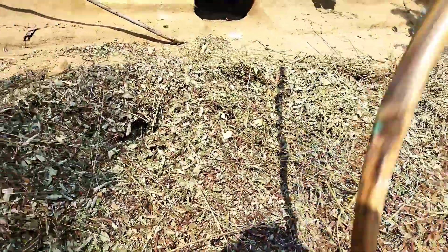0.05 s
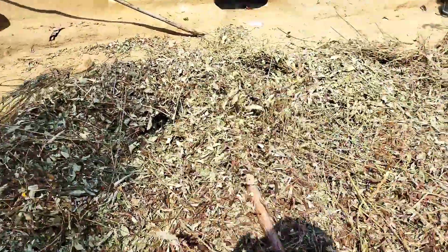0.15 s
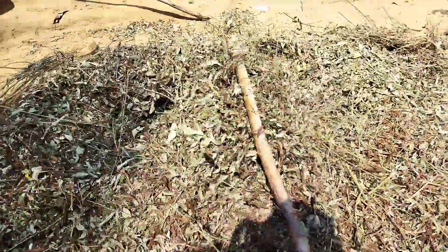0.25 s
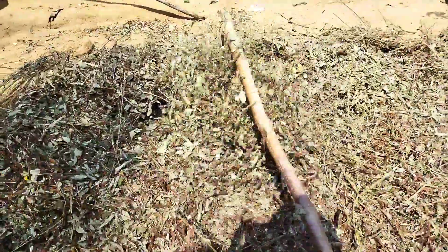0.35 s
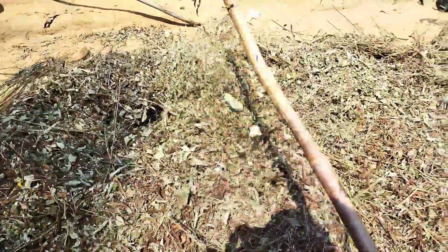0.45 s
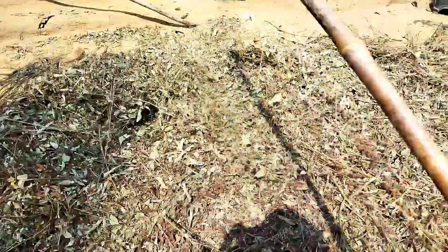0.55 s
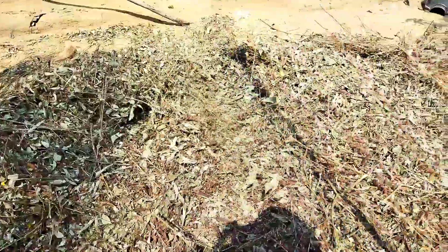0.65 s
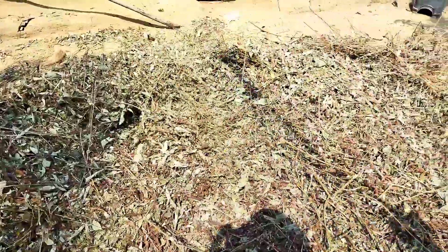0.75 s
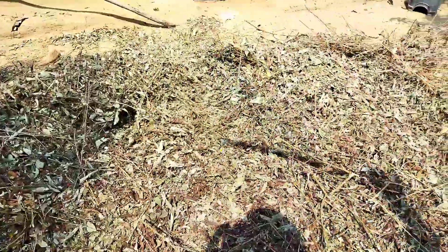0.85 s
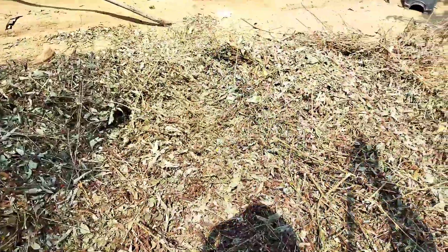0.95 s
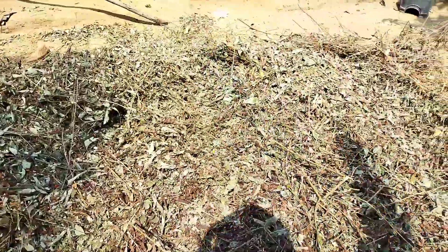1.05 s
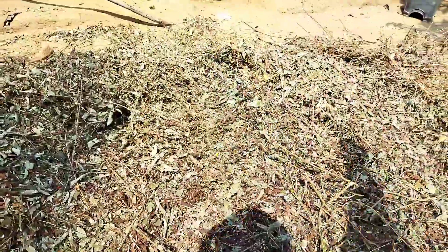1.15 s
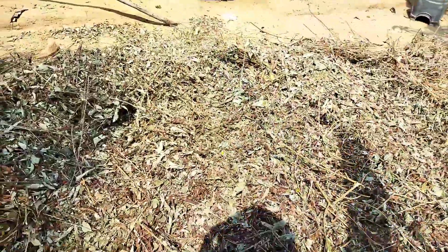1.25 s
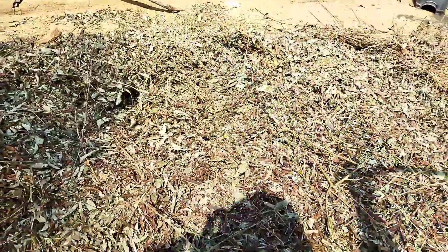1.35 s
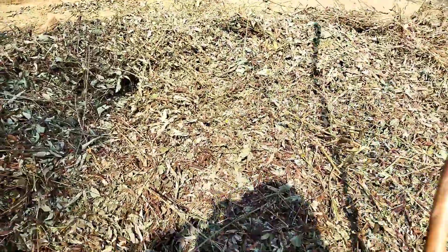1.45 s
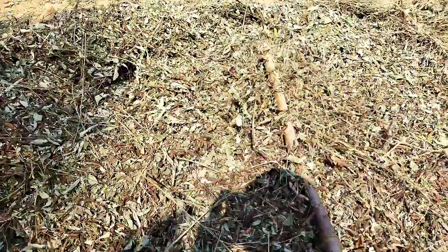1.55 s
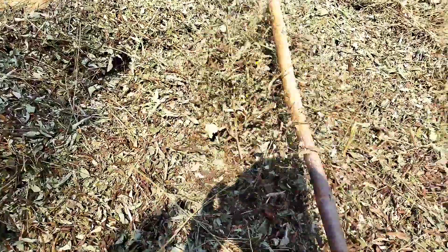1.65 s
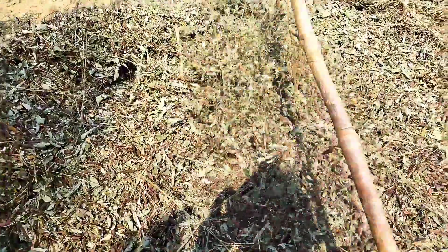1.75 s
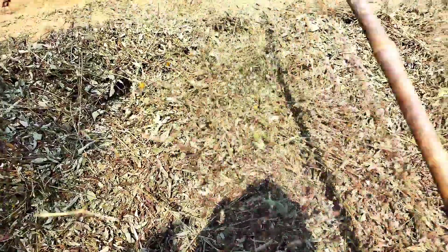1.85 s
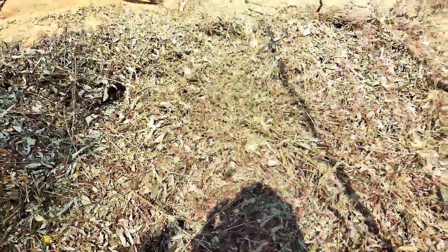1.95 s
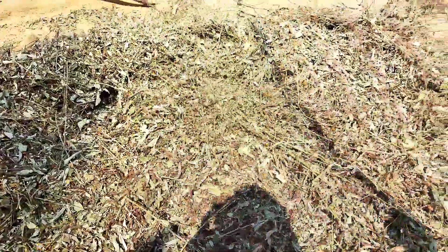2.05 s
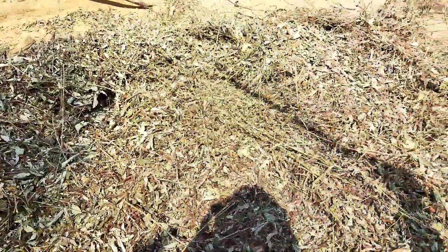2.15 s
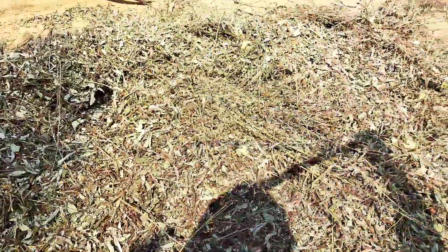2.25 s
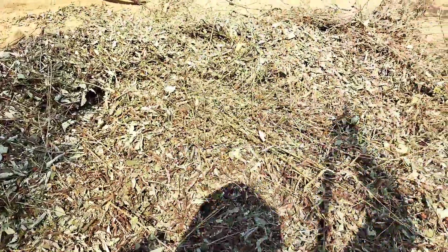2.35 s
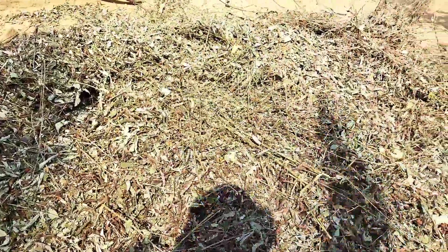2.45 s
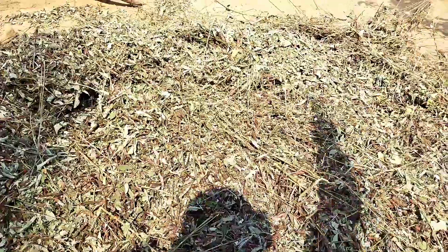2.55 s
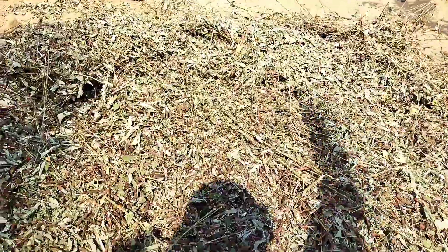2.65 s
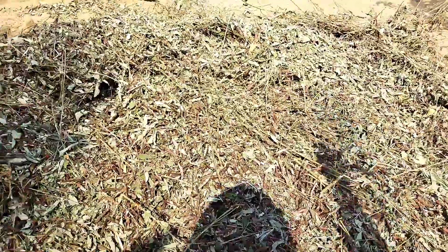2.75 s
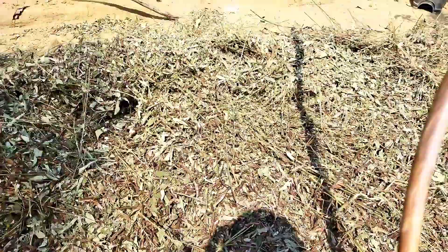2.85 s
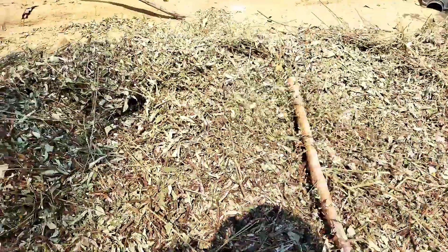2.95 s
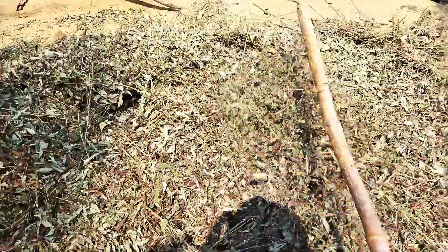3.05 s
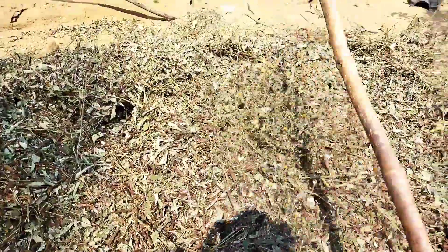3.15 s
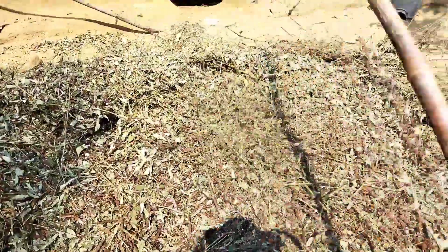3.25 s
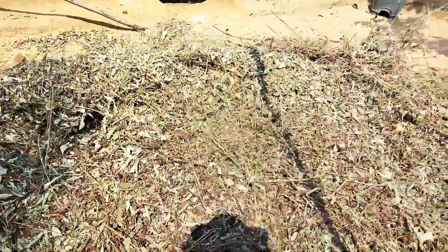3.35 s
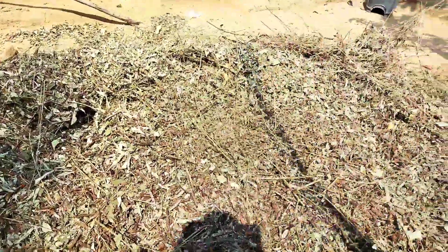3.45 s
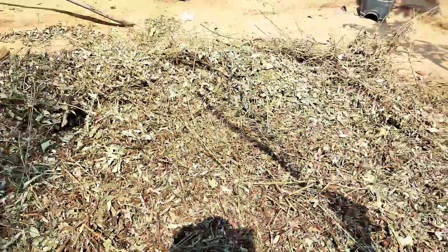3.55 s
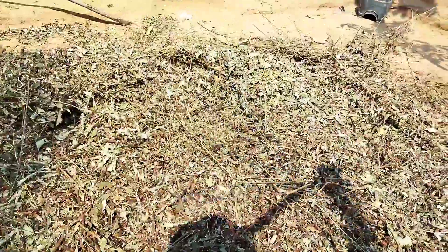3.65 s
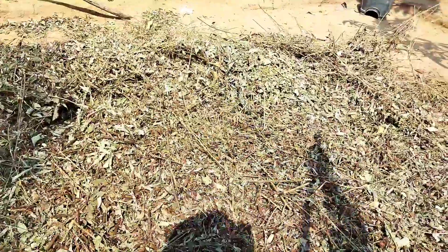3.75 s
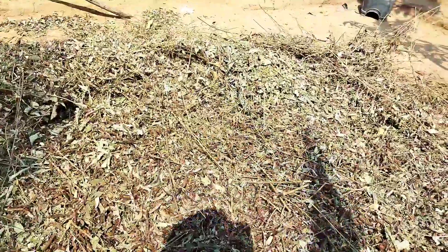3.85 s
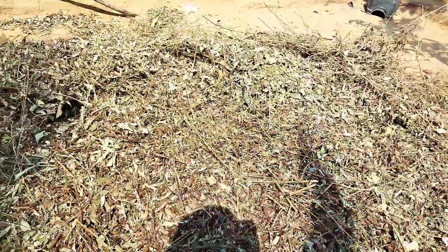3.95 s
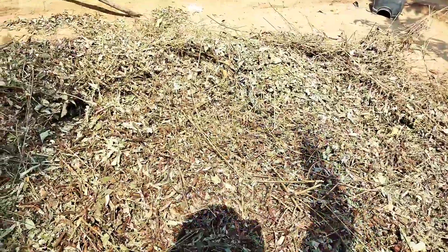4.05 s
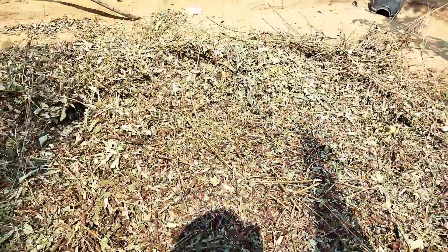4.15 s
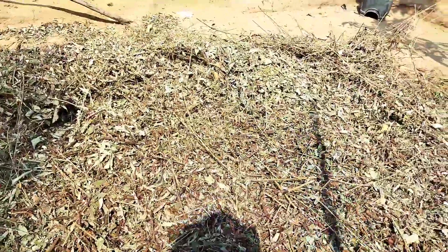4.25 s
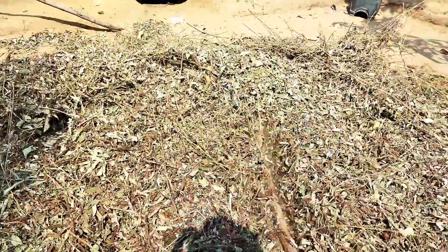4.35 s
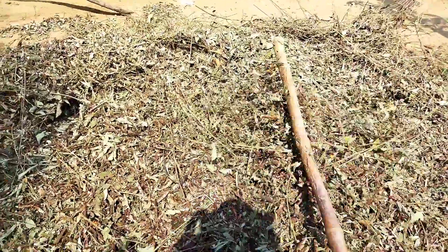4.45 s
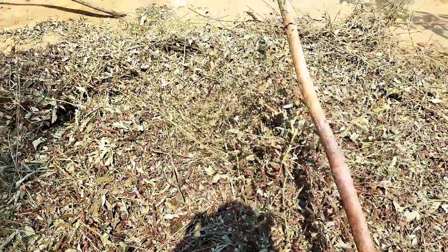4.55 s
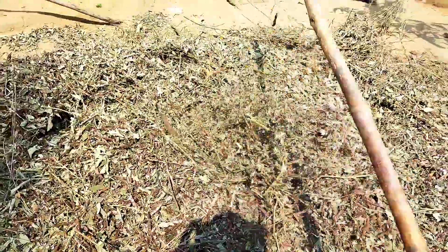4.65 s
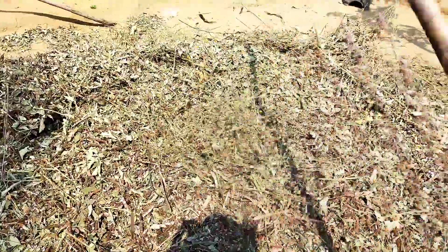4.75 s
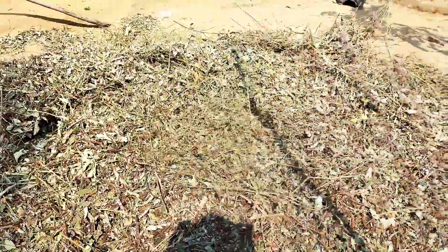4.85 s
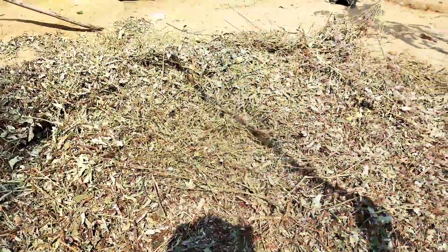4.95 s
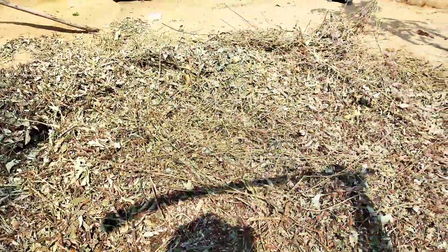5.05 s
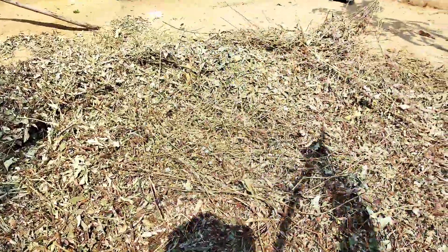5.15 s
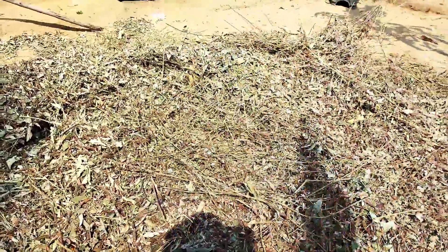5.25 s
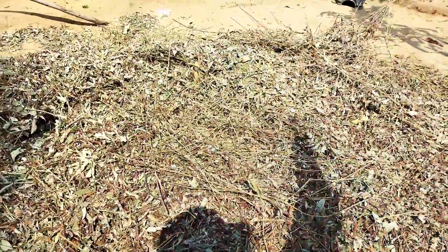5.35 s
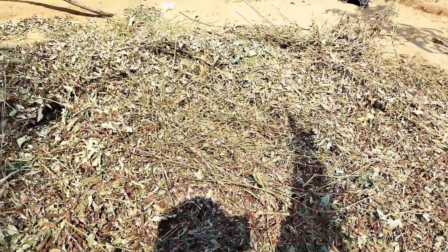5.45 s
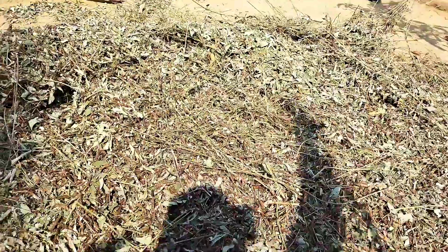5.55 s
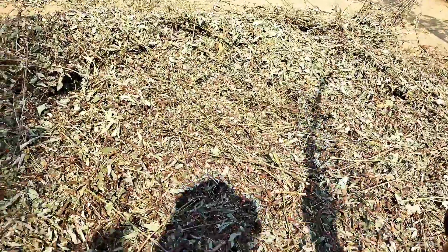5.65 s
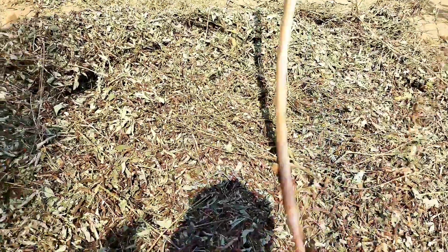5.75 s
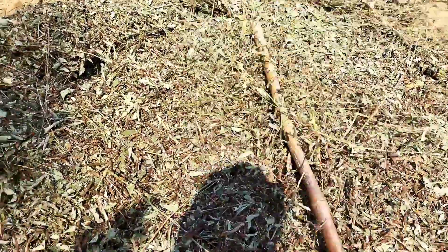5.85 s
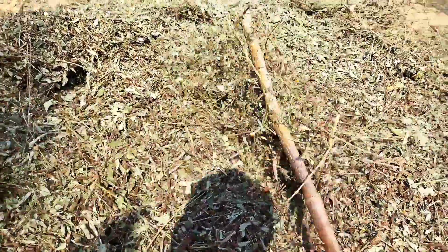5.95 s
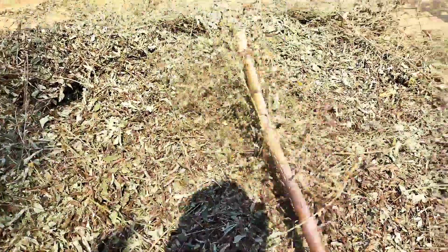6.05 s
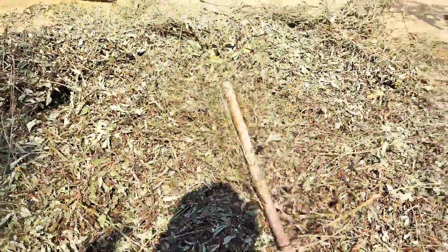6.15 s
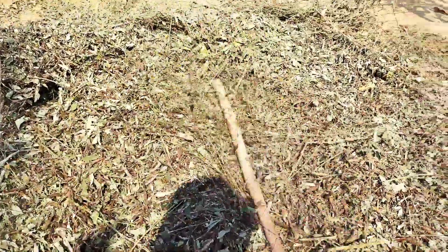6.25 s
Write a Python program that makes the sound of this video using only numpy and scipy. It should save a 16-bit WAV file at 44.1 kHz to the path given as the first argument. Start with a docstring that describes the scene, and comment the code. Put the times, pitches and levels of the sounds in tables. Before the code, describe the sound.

Outdoors in an open yard, close stereo, with a very faint low murmur and hiss. Brief rustles lead to the first stick blow at 0.23 s: a bright, dense crunch of dry stalks lasting about a hundredth of a second, with a lighter thud. Chaff patters down with crisp snaps until about 1.1 s, including a sharp snap and woody knock at 0.95. A low airy hum rises into each next blow, at 1.6, 3.0, 4.46 and 5.87 s. These thud more deeply, the fourth somewhat softer with a dull woody knock; short echoes and a low blurred tail follow. After each, fine debris and ticking twigs rain down for roughly 0.6 to 0.8 s, brighter at left, then thin to near quiet. A hard snap clicks at left at 5.70, just before the last blow; its falling chaff ends with a strong rustle near 6.3 s.

```python
"""Stick on dry stalks

A long stick is swung down five times on a heap of dry stalks in an open yard, an arm's length from two ports.
Each swing hums (a gliding tone in noise), crunches (dense ringing ticks) and thuds (a pressure dip); the yard
answers with fixed echoes and decaying noise bands. Chaff and twigs patter down as finer ticks, single stems
snap as short noise bursts, some dull knocks are damped sines, and shaped noise makes a faint outdoor hush.
"""
import sys
import numpy as np
from scipy import signal
from scipy.fft import rfft, irfft
from scipy.io import wavfile
from scipy.ndimage import uniform_filter1d

SR = 44100
rng = np.random.default_rng(int(sys.argv[2]) if len(sys.argv) > 2 else 0)


def persist_wave(psi):
    """Save psi, clipped to +-1, as 16-bit WAV."""
    counts = np.round(np.clip(psi, -1, 1) * 32767).astype(np.int16)
    wavfile.write(sys.argv[1], SR, np.atleast_2d(counts).T)


def undo_db(level):
    """Turn decibels back into plain size, where 20 dB means ten times bigger."""
    steps = np.asarray(level, float) / 20
    return 10 ** steps


N = 277389
T = np.arange(N) / SR


def unit(x):
    """Scaled to rms 1."""
    return x / np.sqrt(np.mean(x ** 2))


def colour(x, points):
    """Causal filter through (f/Hz, level/dB) points, from the folded cepstrum of the log gain."""
    hz, db = np.transpose(points)
    grid_hz = np.arange(1025) * SR / 2048 + 1
    gain = undo_db(np.interp(np.log(grid_hz), np.log(hz), db))
    cepstrum = irfft(np.log(gain))
    cepstrum[1:1024] *= 2
    cepstrum[1025:] = 0
    response = irfft(np.exp(rfft(cepstrum)))
    return signal.fftconvolve(x, response[None], axes=1)[:, :x.shape[1]]


def ring(x, hz, width_hz):
    """Two-pole resonance, gain 1 at the centre."""
    hz = min(hz, .45 * SR)
    return signal.lfilter(*signal.iirpeak(hz, hz / width_hz, fs=SR), x)


def pair(like):
    """Left and right noise that share the part 'like' of their power."""
    mid, side = rng.standard_normal((2, N))
    like = np.clip(like, 0, 1)
    return np.sqrt((1 + like) / 2) * mid + np.sqrt((1 - like) / 2) * side * np.array([[1], [-1]])


def walk(rate):
    """Random levels held 1 / rate s and slewed twice, rms 1."""
    hold = int(SR / rate)
    steps = np.repeat(rng.standard_normal(N // hold + 1), hold)
    return unit(uniform_filter1d(uniform_filter1d(steps, hold), hold)[:N])


def add(out, s, x):
    """Mixes x into out from time s."""
    i = int(s * SR)
    out[:, i:i + x.shape[-1]] += x[..., :N - i]


def crackle(count, spread_db, lag_ms, lag_spread_ms, cycles):
    """Tiny breaks of all sizes ring briefly in seven pitch bands, each with its own lag and pan."""
    out = 0
    for hz in 700 * 2 ** np.arange(0, 4.6, .75):
        at = rng.integers(64, N - 64, count)
        sign = rng.choice([-1, 1], count)
        size = sign * undo_db(spread_db * np.minimum(rng.exponential(size=count), 4.5))
        lag, pan_db = rng.standard_normal((2, count))
        lag = np.round((lag_ms + lag_spread_ms * lag) * SR / 1000)
        lag = np.clip(lag, -60, 60).astype(int)
        left = np.bincount(at + lag, size * undo_db(1.5 * pan_db), N)
        right = np.bincount(at, size * undo_db(-2.5 * pan_db), N)
        out = out + ring(np.array([left, right]), hz, hz / cycles)
    return unit(out)


# spectrum of the outdoor background: f/Hz, relative level/dB
HUSH_COLOUR = [(24, -26), (45, -9.5), (100, -0.5), (300, -2), (1000, -8.5), (2000, -8.5), (3200, -8.5),
               (6300, -16), (12000, -13.5)]


def hush():
    """Outdoor background: wavering low murmur, more alike at both ports than the hiss above it."""
    low = signal.lfilter(*signal.butter(1, 500, fs=SR), pair(.5))
    high = signal.lfilter(*signal.butter(1, 500, "high", fs=SR), pair(0))
    waver_db = 1.3 * walk(5)
    return undo_db(-55.5 + waver_db) * unit(colour(low + high, HUSH_COLOUR))


# chaff thrown up by each blow comes down: first fall level/dB, crest t/s, crest level/dB,
# thinning t/s, stragglers' level/dB, stop t/s
CHAFF_SHOWERS = [(-41.5, 0.6, -42.5, 0.725, -55.5, 1.06), (-42.5, 1.95, -41.5, 2.11, -48, 2.25),
                 (-42.5, 3.37, -45, 3.46, -52, 3.69), (-49.5, 4.72, -40, 5.01, -50, 5.172),
                 (-40.5, 6.2, -44, 6.4, -50, 6.6)]
# short rustles as stick or feet brush the heap: top t/s, level/dB, rise/s, fall/s
HEAP_BRUSHES = [(.184, -38, 0.0027, 0.015), (0.209, -34, .015, 0.015), (.838, -47, 0.017, 0.019),
                (2.088, -46, 0.013, 0.031), (3.74, -61, 0.019, 0.065), (3.9, -61.5, 0.061, 0.09),
                (4.999, -43, 0.022, 0.013), (5.35, -53, 0.042, 0.062), (5.708, -50.5, 0.033, 0.059),
                (6.29, -29, 0.022, 0.041)]


def heap_db():
    """Level of the rustling heap: a shower after each blow, a stir before it, and brushes, added as power."""
    sag_db_per_s, thin_s = 20.5, 0.042
    stop_s, stop_db, dying_db_per_s = 0.045, 9.5, 55
    stir_lead_s, stir_rise_s, stir_db_per_s = 0.22, 0.053, 11.5
    power = np.full(N, 1e-9)
    for (s, *_), (*_, stir_db), shower in zip(STICK_BLOWS, STICK_SWINGS, CHAFF_SHOWERS):
        first_db, crest, crest_db, thins, late_db, stops = shower
        times = np.maximum.accumulate([s, crest, thins, thins + thin_s, stops, stops + stop_s])
        sagged_db = crest_db - sag_db_per_s * (thins - crest)
        levels = [first_db, crest_db, sagged_db, late_db, late_db, late_db - stop_db]
        fall_db = np.interp(T, times, levels) - dying_db_per_s * np.maximum(T - times[-1], 0)
        power += undo_db(2 * fall_db) * (T >= s)
        stir_onset = 1 / (1 + np.exp(-(T - s + stir_lead_s) / stir_rise_s))
        stir = undo_db(stir_db + stir_db_per_s * (T - s)) * stir_onset
        power += stir ** 2 * (T < s)
    for s, db, rise, fall in HEAP_BRUSHES:
        power += undo_db(2 * db) * np.exp(-((T - s) / np.where(T < s, rise, fall)) ** 2)
    return 10 * np.log10(power)


# spectrum of the falling chaff and twigs: f/Hz, relative level/dB
STALK_COLOUR = [(400, -14), (1200, -9.5), (2300, -4.5), (4000, -1), (5700, -5), (7200, -6.5), (9100, -0.5),
                (11100, -2.5), (13000, 4.5), (15500, 1.7)]


def patter():
    """Falling chaff: fine crackle that flickers, with coarser twigs, louder at the left port in the treble."""
    chaff = crackle(count=16000, spread_db=0.5, lag_ms=.24, lag_spread_ms=0.11, cycles=0.83)
    chaff = colour(chaff, STALK_COLOUR)
    twigs = crackle(count=800, spread_db=2.0, lag_ms=.24, lag_spread_ms=.12, cycles=2.7)
    twigs = ring(colour(twigs, STALK_COLOUR), 10500, 9000)
    rattle = rng.standard_normal(260) * np.exp(-np.arange(260) / 24)  # a landing twig rattles for a few ms
    twigs = signal.fftconvolve(twigs, rattle[None], axes=1)[:, :N]
    # heavier twigs land last
    late = sum(np.clip((T - s) / 0.36, 0, 1) * (T < s + 1.3) for s, *_ in STICK_BLOWS)
    debris = undo_db(-1.5 * late) * unit(chaff) + undo_db(-12.5 + 8 * late) * unit(twigs)
    debris[0] += 1.25 * ring(debris[0], 7700, 3900)
    flicker_db = 1.2 * walk(120) + 1.2 * walk(25)
    return undo_db(heap_db() + flicker_db) * debris / np.std(debris.mean(axis=0))


# dull woody knocks: t/s, level after the attack/dB, f/Hz, t60/s
WOODY_KNOCKS = [(.9518, -53, 800, 0.04), (.9525, -49, 1500, .012), (.9512, -42, 2330, 0.01),
                (5.146, -51, 220, .24), (5.147, -58, 810, 0.03), (5.7035, -54, 1180, .05),
                (5.703, -51, 2200, .02), (3.853, -58, 1700, .008), (4.4708, -30, 700, .025)]


def knocks():
    """Dull woody knocks: damped sines with a stronger first few milliseconds."""
    out, t = np.zeros((2, N)), np.arange(0, .2, 1 / SR)
    for s, db, hz, t60 in WOODY_KNOCKS:
        tone = undo_db(db - 60 * t / t60) * np.sin(2 * np.pi * hz * t)
        attack = (1 - np.exp(-t * hz)) * (1 + 7.5 * np.exp(-t / 0.0061))
        add(out, s, (tone * attack)[None])
    return out


# stems that snap: t/s, level/dB, ring f/Hz, left minus right level/dB, length/ms
STEM_SNAPS = [(0.6012, -32, 10900, 8, 2.5), (.635, -34, 11800, 6, 2.1), (0.687, -37, 8700.0, 12, 4.2),
              (0.775, -38.5, 12800.0, 6.5, 3.0), (0.793, -38, 14500, 7.5, 2.8),
              (0.8176, -42, 14100.0, 0, 4.7), (0.845, -34.5, 11100, 7, 3.7), (0.93, -38, 12700.0, -1, 1.8),
              (0.9509, -24, 11400, 0.5, 2.1), (0.9508, -29, 4630, -1, 1.7),
              (0.9697, -36, 13600.0, 7.5, 1.5), (1.09, -34.5, 14300, 8.5, 5.1),
              (1.104, -43, 1440, 3.5, 1.9), (1.9428, -31.5, 11850, 7, 4.4), (1.979, -36, 9000, 9, 2.2),
              (1.9962, -31, 13000, 6.5, 1.5), (2.092, -35, 12000, 7.5, 3.3), (2.106, -29, 12500, 7, 1.6),
              (2.243, -46, 5000, 5, 1.6), (2.3544, -30, 12600, 4.5, 1.7), (2.417, -46.5, 7800, 1.5, 4.1),
              (3.2826, -31.5, 11500, 1, 2.4), (3.4274, -34.5, 9600, 3, 2.0),
              (3.468, -34, 13600.0, 6.5, 3.2), (3.4737, -47, 1200, 4.5, 1.5),
              (3.5003, -36.5, 9100, 5.5, 3.4), (3.512, -38, 9000, 5.5, 1.5), (3.563, -37.5, 9100, 11, 4.2),
              (3.584, -35, 13000, 4.5, 2.1), (3.602, -30, 12000, 5, 1.5), (3.6528, -37, 11600, 4, 1.9),
              (3.662, -35, 12500, 0, 2.2), (4.0645, -38.5, 11800, -7, 1.9), (4.7864, -36, 4200, 3.5, 2.3),
              (4.79, -30, 9500, 5, 2.5), (4.9153, -29, 13300, 0, 1.2), (5.0124, -32, 11500, 3, 2.6),
              (5.0304, -36, 9450, 11, 1.8), (5.07, -33.5, 11100, 6.5, 5.9), (5.089, -31, 14900.0, 5, 2.3),
              (5.103, -35, 9700, 0, 1.7), (5.147, -40.5, 3270, 3, 4.2), (5.212, -44, 10300, 7, 4.6),
              (5.2548, -36.5, 1160, 2.5, 1.5), (5.2687, -39, 8700, 8, 2.2), (5.354, -43, 9300, 0, 6),
              (5.7027, -19.5, 6860, 9.5, 1.28)]


def snaps():
    """Each stem splits in a quick burst, part broad, part ringing, and leaves a short fizz."""
    out, t = np.zeros((2, N)), np.arange(0, .04, 1 / SR)
    noises = rng.standard_normal((len(STEM_SNAPS), 4, len(t)))
    for (s, db, hz, pan_db, length_ms), (common, left, right, fibres) in zip(STEM_SNAPS, noises):
        top = (1 - np.exp(-t / .0001)) * np.exp(-(1000 * t / max(length_ms, .4)) ** 1.17)
        fizz = undo_db(-19) * np.exp(-t / 0.014)
        burst = (common + np.array([left, right])) * (top + fizz)
        burst *= undo_db(4.5 * unit(uniform_filter1d(fibres, size=20)))  # fibres give way one after another
        ringing = ring(burst, hz, 500 + 0.2 * hz) * np.sqrt(11000 / hz)
        broad_db = -23.0 + 0.5 * (db + 32.0)  # thick stems crack wider
        burst = ringing + undo_db(broad_db) * colour(burst, CRUNCH_COLOUR)
        energy = np.mean(np.sum(burst ** 2, axis=1))
        pan = undo_db(np.array([[pan_db], [-pan_db]]) / 2)
        burst *= undo_db(db) * pan * np.sqrt(2 * np.sum(top ** 2) / energy)
        # stems to the left reach the left port sooner
        lag_ms = np.clip(.38 - 0.085 * pan_db, -.45, .45)
        add(out[:1], s + lag_ms / 1000, burst[:1])
        add(out[1:], s, burst[1:])
    return out


# the swing before each blow: hum level at contact/dB, hum lead/s, hum f at contact/Hz,
# level of the heap's stir at contact/dB
STICK_SWINGS = [(-51, 0.05, 120, -50), (-38, 0.084, 108, -54.5), (-42, 0.085, 108, -52.5),
                (-37.5, 0.068, 118, -51), (-36, 0.061, 110, -56)]


def swings():
    """Eddies shed by the stick hum louder and higher as it speeds up, inside a wider swish of air."""
    hum_env, air_env, hz = np.zeros(N), np.zeros(N), np.zeros(N)
    for (s, *_), (db, lead, top_hz, _) in zip(STICK_BLOWS, STICK_SWINGS):
        t = np.clip(T - s, -.5, .02)
        hum_env += undo_db(db + 52 * t) / (1 + np.exp(-(t + lead) / 0.011)) * (T < s + .012)
        air_env += undo_db(-46.0 + 61.5 * t) * (T < s) * (T > s - .45)
        hz += top_hz * (1 + 2.2 * t) * (np.abs(T - s) < .4)
    tone = np.sin(2 * np.pi * np.cumsum(hz * (1 + .04 * walk(40))) / SR)
    tone *= undo_db(1.5 * walk(35))
    rough = undo_db(-10.0) * unit(ring(pair(0.78), 228, 97))
    swish = unit(ring(ring(pair(0.073), 930, 5400), 980, 6100))
    hum = uniform_filter1d(hum_env, size=200) * (tone + rough)
    return hum + uniform_filter1d(air_env, size=800) * swish


# returns of the thud from walls and ground around: delay t/s, level before the yard gain/dB, f/Hz, spread/s
YARD_ECHOES = [(0.019, -34, 240, 0.0039), (.037, -36, 295, 0.0047), (0.05, -27, 150, 0.0055),
               (.078, -30, 185, .010), (.099, -33.5, 140, .006), (.147, -38.5, 169, .007)]
# scattered sound of the yard: f/Hz, width of each of two resonances/Hz, level before the yard gain/dB, t60/s
YARD_SCATTER = [(118, 38, -36, 0.7), (177.2, 65, -30, 0.41), (260, 100, -31, 0.34), (400, 170, -34.5, 0.2)]


def thuds():
    """A pressure dip as the stick meets the ground, then the same echoes; the scatter differs by spot."""
    out, t = np.zeros((2, N)), np.arange(0, .55, 1 / SR)
    echoes = 0
    for delay, db, hz, spread in YARD_ECHOES:
        after = t - delay
        echoes = echoes - undo_db(db) * np.cos(2 * np.pi * hz * after) * np.exp(-(after / spread) ** 2)
    build = 1 - np.exp(-t / 0.022)
    bands = []
    for hz, width_hz, db, t60 in YARD_SCATTER:
        noise = unit(ring(ring(pair(0.82), hz, width_hz), hz, width_hz))
        bands.append((build * undo_db(db - 60 * t / t60), noise))
    u = np.arange(-.01, .01, 1 / SR)
    for s, _, reach, db, _ in STICK_BLOWS:
        # a harder thud is shorter and wakes the yard more
        hz = 206 + 11.5 * (db + 11.0)
        yard_db = 2.5 + 0.34 * (db + 11.5)
        a = (np.pi * hz * u) ** 2
        pulse = (1 - 2 * a) * np.exp(-a)
        dip = -undo_db(db) * pulse * (1 + 110 * u)
        shove = undo_db(db - 19.5) * np.cos(np.pi * u / .02) ** 2  # the heap is pressed flat
        add(out[:1], s + reach + u[0] + 0.00034, (dip + 1.8 * shove)[None])
        add(out[1:], s + reach + u[0], (dip + 0.63 * shove)[None])
        add(out, s + 0.0038 + u[0], undo_db(-26) * pulse[None])  # the heap takes the first push
        start = int(s * SR / 2)  # another stretch of noise for each blow
        scatter = sum(fade * unit(noise[:, start:start + len(t)]) for fade, noise in bands)
        add(out, s + reach, undo_db(yard_db) * (echoes + scatter))
    return out


# blows: first contact t/s, crunch level before its envelope/dB, time to reach the ground/s,
# thud level/dB, ring of the thick stalks hit f/Hz
STICK_BLOWS = [(.231, -11, 0.014, -18, 2780), (1.6112, -14, 0.013, -10.5, 3300),
               (3.011, -13, .014, -8.5, 864), (4.4638, -11.5, 0.01495, -14.5, 1940),
               (5.873, -12, 0.016, -9, 3150)]
# crushed stalks settling after each blow: level under its crunch/dB, lasting/s
STALK_SETTLING = [(-15, .08), (-16.5, 0.096), (-23, 0.1), (-20.5, 0.088), (-23, 0.085)]
# spectrum of breaking stalks: f/Hz, relative level/dB
CRUNCH_COLOUR = [(250, -21), (600, -3.5), (1200, -4.5), (2200, -2), (3400, -2), (5500, -3.5), (9200, 0.5),
                 (11100, 1), (14200, 4.5)]


def crunch():
    """The stick breaks through the heap for about a hundredth of a second; the crushed stalks then settle."""
    breaks = crackle(count=60000, spread_db=3.0, lag_ms=0.15, lag_spread_ms=0.22, cycles=1.24)
    lumps, stems = walk(150), walk(900)  # the heap gives way unevenly, stem by stem
    out, t = np.zeros((2, N)), np.arange(-.008, .3, 1 / SR)
    for (s, db, reach, _, stalk_hz), (settle_db, lasts) in zip(STICK_BLOWS, STALK_SETTLING):
        onset = np.exp(np.minimum(t, 0) / 0.0014)
        swell = 0.4 + 0.8 * np.clip(t / .0015, 0, 1) * (0.4 + np.exp(-np.abs(t - .004) / 0.004))
        through = onset * swell / (1 + np.exp((t - 0.88 * reach) / 0.0015))
        settle = (t > 0) * (undo_db(-6.0 - 240 * t) + undo_db(settle_db) * np.exp(-(t / lasts) ** 2))
        settle = settle * undo_db(1.2 * lumps[int(s * SR):][:len(t)])
        i = int((s + t[0]) * SR)
        sound = unit(colour(breaks[:, i:i + len(t)], CRUNCH_COLOUR))
        thin = sound - .4 * ring(sound, 1200, 2000)  # settling stalks have less body
        woody = ring(through * sound, stalk_hz, 0.44 * stalk_hz)
        mix = through * sound + np.maximum(settle - through, 0) * thin + woody
        add(out, s + t[0], undo_db(db + 1.5 * stems[i:i + len(t)]) * mix)
    return out * undo_db([[1.1], [-1.1]])  # a little louder at the left port


def scene():
    """Blows, falling debris and background."""
    return swings() + crunch() + thuds() + patter() + snaps() + knocks() + hush()


def roll_off(x):
    """The treble ends steeply here."""
    return signal.sosfilt(signal.butter(12, 16810, fs=SR, output="sos"), x)


def record(dry):
    """The phone thins the lowest bass, rounds the loudest peaks and cuts the top."""
    wet = signal.sosfilt(signal.butter(2, 30, "high", fs=SR, output="sos"), dry)
    wet = .7 * np.tanh(wet / .7)
    wet = signal.sosfilt(signal.ellip(6, .3, 34, 15700, fs=SR, output="sos"), wet)
    return roll_off(wet)


dry = scene()
out = record(dry)
persist_wave(out)
```